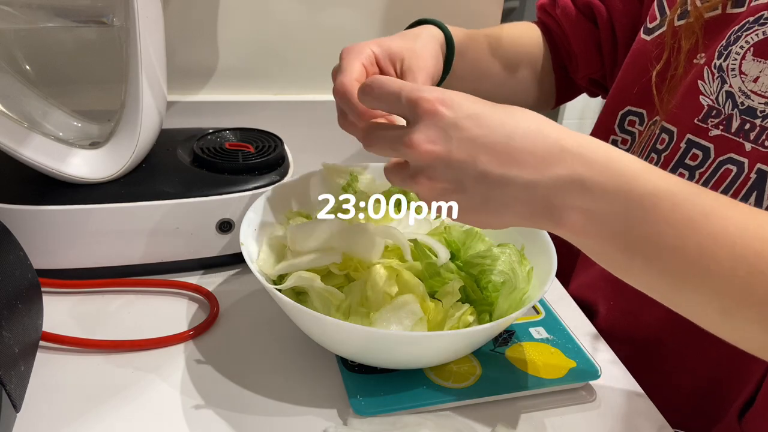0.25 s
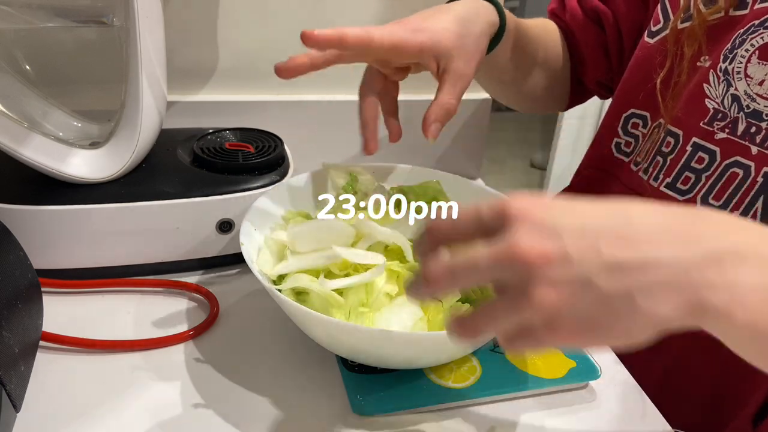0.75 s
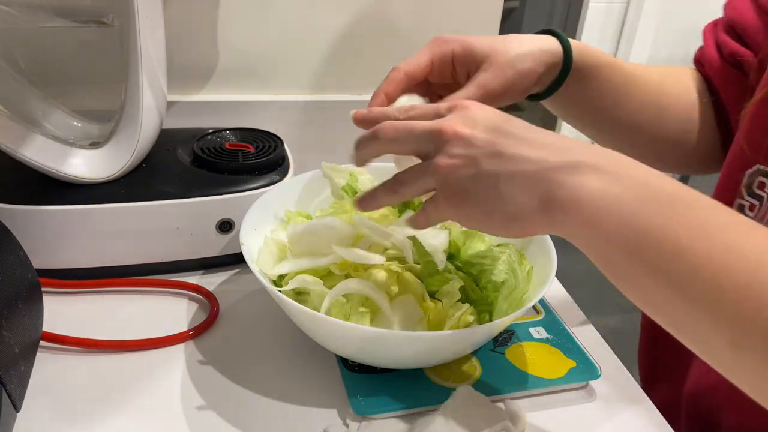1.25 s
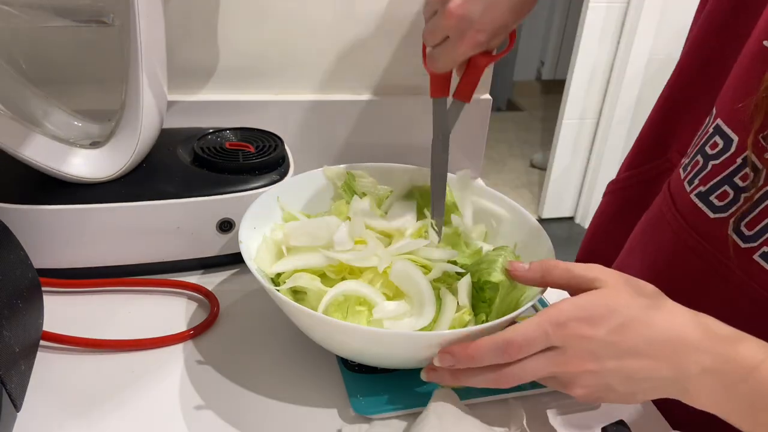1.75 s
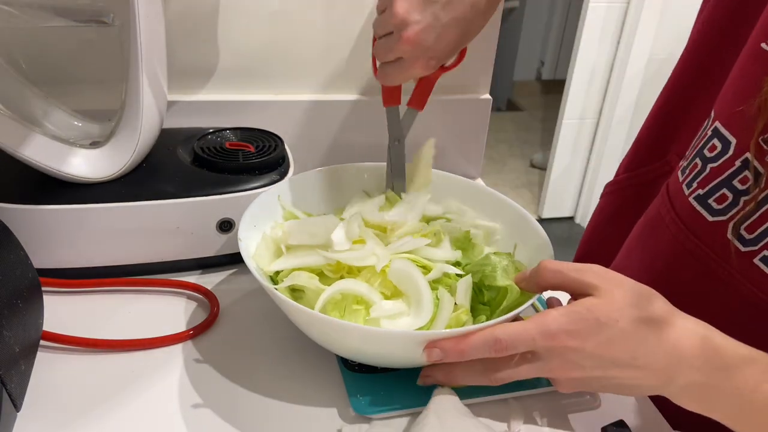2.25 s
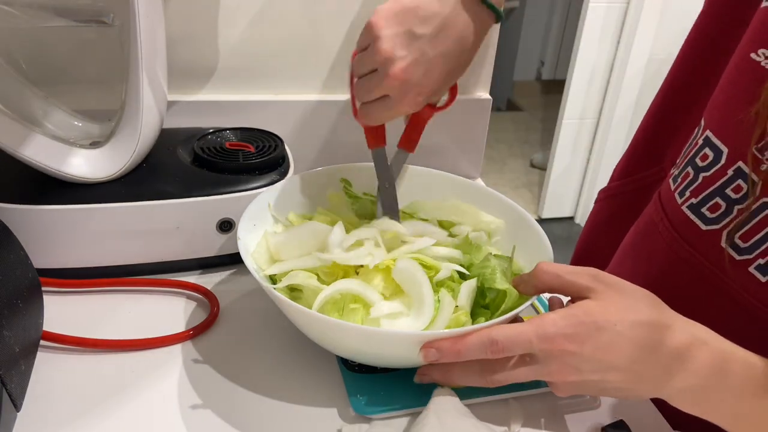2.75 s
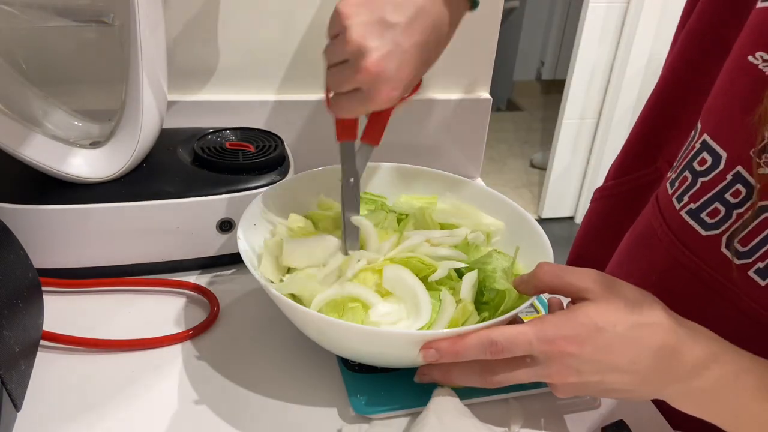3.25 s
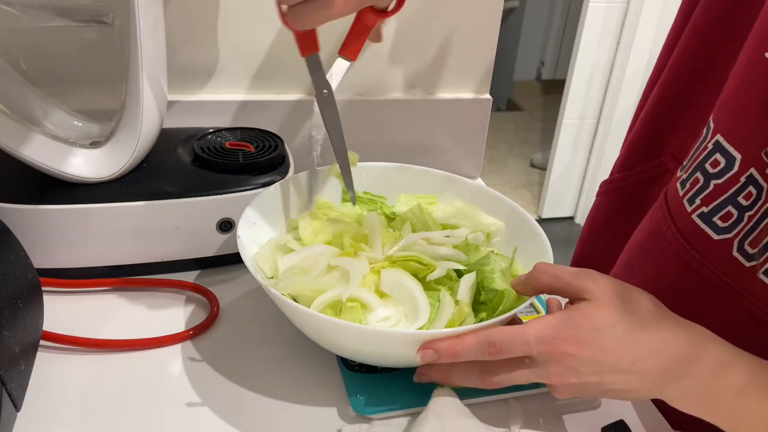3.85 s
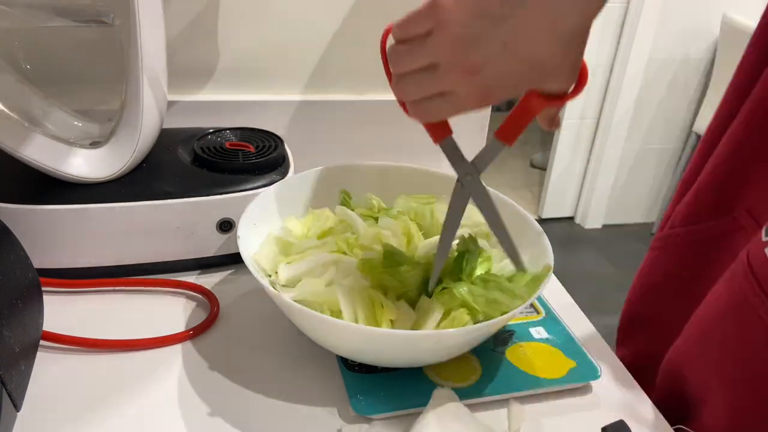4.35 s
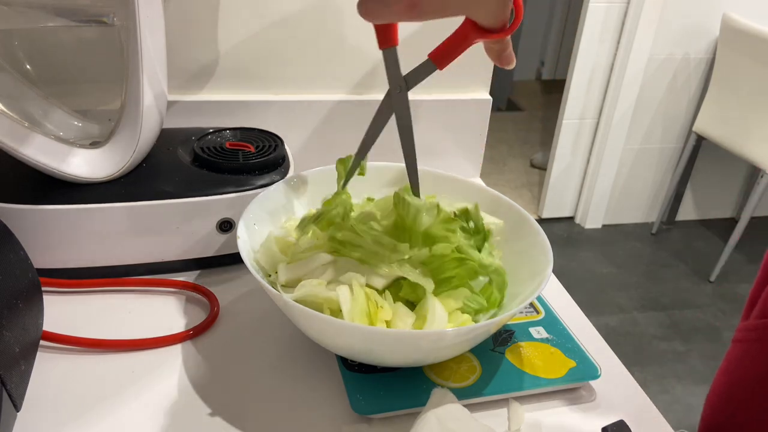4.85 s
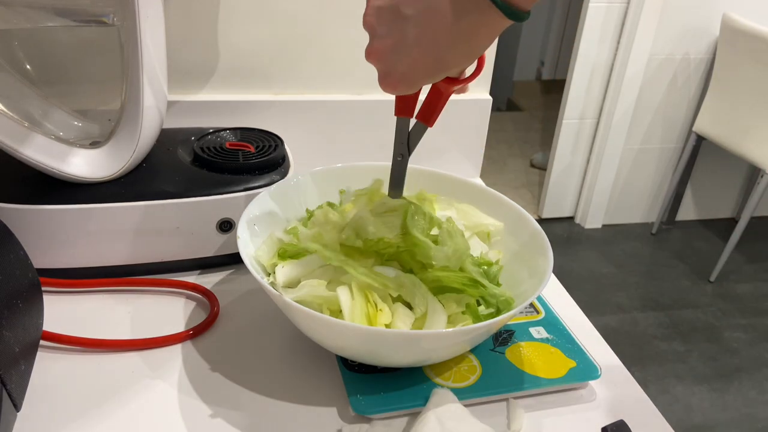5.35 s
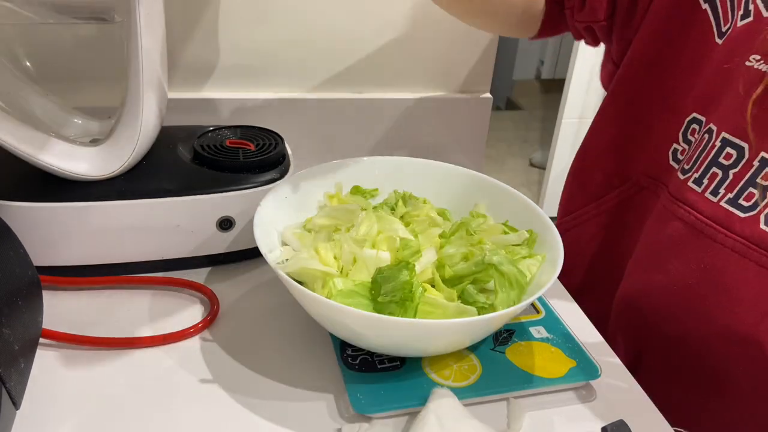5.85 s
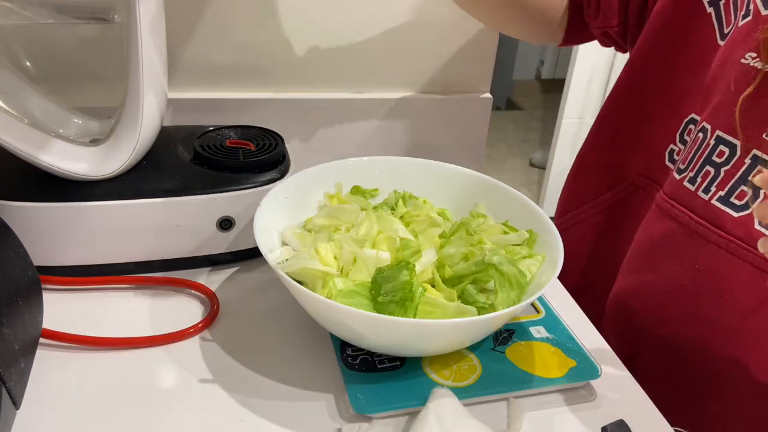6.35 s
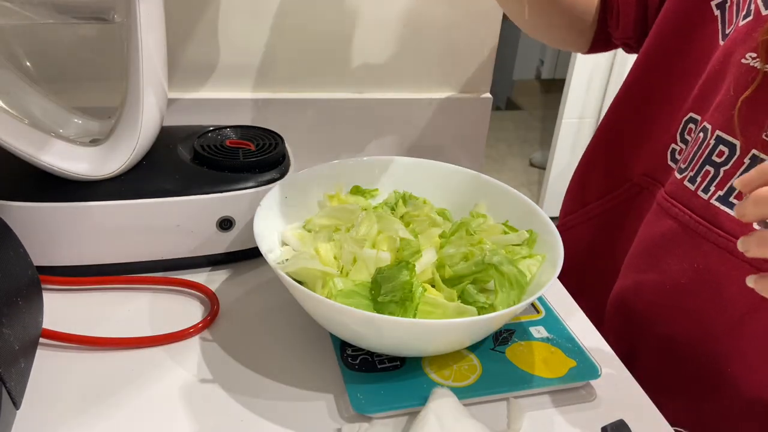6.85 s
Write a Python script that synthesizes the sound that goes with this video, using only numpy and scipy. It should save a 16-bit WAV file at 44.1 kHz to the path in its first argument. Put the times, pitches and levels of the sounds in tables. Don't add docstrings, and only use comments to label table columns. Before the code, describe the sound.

A steady low fan drone fills a small hard-walled kitchen, heard in close stereo beside a salad bowl. From 0 to 1.7 seconds leaves are pulled apart quietly: fine crackles, dull rustles and tiny rib snaps, with a brief dip to silence at 0.86 and the sharpest tear around 1.1. After another cut at 1.68, a soft, distant blade closing, then scissors crunch wetly through leaves from 2.0. Loud cracks with short metal rings fall near 2.3, 2.8, 3.3, 3.7 and 4.1, with low bowl thumps between. A tiny gap at 4.35 precedes a blade jab at 4.4 and a last snip at 4.6; coarse crunches cluster around 5.0 to 5.3. After a cut at 5.62, salt hisses back and forth in a glass shaker, with bright ticks and stronger knocks near 6.4, 6.65 and 6.9, fading into the hum.

```python
import sys
import numpy as np
from scipy import signal
from scipy.fft import rfft, irfft, next_fast_len
from scipy.io import wavfile
from scipy.ndimage import uniform_filter1d

SR = 44100
rng = np.random.default_rng(int(sys.argv[2]) if len(sys.argv) > 2 else 0)


def decibels_to_gain(level_db):
    exponent = np.asarray(level_db, float) / 20
    return 10 ** exponent


def store_wav(level_fs):
    pcm = np.round(np.clip(np.atleast_2d(level_fs), -1, 1) * 32767)
    wavfile.write(sys.argv[1], SR, pcm.T.astype(np.int16))


N = 313110
TIME = np.arange(N) / SR
SIZE = next_fast_len(N + SR)
HZ = np.arange(SIZE // 2 + 1) * SR / SIZE + 0.0008


def shape(x, gain):
    return irfft(rfft(x, SIZE) * gain, SIZE)[..., :N]


def along(table):
    hz, value = np.transpose(table)
    return np.interp(np.log(HZ), np.log(hz), value)


def bumps(table):
    return decibels_to_gain(sum(db * np.exp(-.5 * ((HZ - hz) / (width / 2)) ** 2) for hz, width, db in table))


def band(x, lo_hz, hi_hz):
    sos = signal.butter(3, [lo_hz, min(hi_hz, .45 * SR)], "bandpass", fs=SR, output="sos")
    return signal.sosfilt(sos, x)


def level(x, db=0):
    return x * decibels_to_gain(db) / np.sqrt(np.mean(x ** 2))


def add(out, x, s):
    i = int(s * SR)
    out[..., i:i + x.shape[-1]] += x[..., :N - i]


def gains(pushes, layers, stops=()):
    out = np.zeros((len(layers), N))
    for start_s, full_s, go_s, db, bright_db in pushes:
        end_s = min([s for s in stops if s > start_s] + [go_s + .3])
        t = TIME[int(start_s * SR):int(end_s * SR)]
        short = np.clip((full_s - t) / max(full_s - start_s, .002), 0, 1)
        late = np.maximum(t - go_s, 0)
        curves = [db + offset + weight * bright_db - attack * short - release * late
                  for offset, weight, attack, release in layers]
        add(out, decibels_to_gain(np.array(curves)), start_s)
    return out


def grains(rate, scatter_db):
    spread = np.minimum(rng.exponential(size=N), 5)
    size = decibels_to_gain(scatter_db * spread) * rng.standard_normal(N)
    return size * (rng.random(N) < rate / SR)


def ring(modes, length=.4):
    t = np.arange(int(length * SR)) / SR
    return sum(decibels_to_gain(db - 60 * t / t60) * np.sin(2 * np.pi * hz * t) for hz, db, t60 in modes)


def burst(db, top_db, rise, t60, lo_hz, air_db):
    t = np.arange(2048) / SR
    envelope = np.minimum(t / rise, 1) * decibels_to_gain(-60 * np.maximum(t - rise, 0) / t60)
    noise = rng.standard_normal(2048) * envelope
    top = band(noise, 9000, 12900) + decibels_to_gain(air_db) * band(noise, 12900, 16500)
    return decibels_to_gain(db) * (band(noise, lo_hz, 9000) + decibels_to_gain(top_db) * top)


# pitch_hz, density_db (per Hz)
FAN_MID = [(21, -69), (35, -21.5), (65, -25), (129, -8), (185, -12), (233, -2), (342, -7.5), (410, -24),
           (490, -17), (572, -23.5), (1110, -29), (1270, -29.5), (6360, -55), (8430, -73), (16000, -57)]
# pitch_hz, width_hz, boost_db
DUCT = [(62, 14, 2), (112, 34, 0.5), (143, 15, -2), (165.5, 14.2, -14), (231.4, 25, 5), (320.3, 29, 3.5),
        (489, 40, 6), (662, 27, 5.5), (858, 49, 6.5), (1129, 37, 7)]
# pitch_hz, likeness_0_to_1, right_phase_rad, left_minus_right_db
FAN_PORTS = [(30, .95, 3, 8), (61, 0.9, 1.5, -0.5), (95, 1, -1.4, 1), (152, 0.97, 0.6, 4.5), (216, 1, 1, 0),
             (262, 0.94, 0.7, 0), (311, 0.66, 0.5, 8.5), (430, 0.43, -1.5, -0.5), (760, 0.02, -2.5, -3),
             (1620, 0.61, -3, 0), (3250, 0.22, -0.5, -0.5), (6260, 0, -15.5, 3), (10540, .6, 0.5, -3),
             (15000, 0.1, -11, -2)]


def fan():
    hz, *columns = np.transpose(FAN_PORTS)
    like, phase, pan_db = (along(np.transpose([hz, c])) for c in columns)
    like = np.clip(like, 0, 1)
    shared, left, right = rfft(rng.standard_normal((3, SIZE)))
    common = np.sqrt(like) * shared
    own = np.sqrt(1 - like)
    pair = np.array([common + own * left, common * np.exp(1j * phase) + own * right])
    colour = decibels_to_gain(along(FAN_MID) + np.array([pan_db, -pan_db]) / 2) * bumps(DUCT)
    return level(irfft(pair * colour, SIZE)[:, :N], -35)


# peak_s, level_db
THUMPS = [
    (1.8, -60),
    (2.1, -47.5),
    (2.862, -50),
    (3.28, -53),
    (3.68, -48),
    (4.03, -56),
    (4.23, -48),
    (4.5, -43),
    (4.84, -62),
    (5.21, -47),
]


def rocking():
    rise_db_s, fall_db_s = 109, 56
    gain = sum(decibels_to_gain(db - np.maximum(rise_db_s * (s - TIME), fall_db_s * (TIME - s))) for s, db in THUMPS)
    return gain * level(band(rng.standard_normal(N), 46.4, 108))


# start_s, full_s, release_s, level_db, brightness_db
SHAKING = [(5.626, 5.7, 5.738, -52, 1.5), (5.79, 5.83, 5.8, -55.5, -1.5), (5.864, 5.9, 5.97, -51, 1.5),
           (6.045, 6.07, 6.14, -60, 0), (6.105, 6.16, 6.24, -50.5, 0), (6.24, 6.26, 6.42, -59.5, -4),
           (6.345, 6.36, 6.33, -52.5, 3.5), (6.392, 6.406, 6.49, -51.5, 2.5), (6.49, 6.52, 6.58, -60, -5),
           (6.585, 6.6, 6.6, -56, 4.5), (6.645, 6.66, 6.722, -52, 2), (6.78, 6.82, 7.1, -58.5, -5.5),
           (6.856, 6.91, 6.97, -50, 1), (7.05, 7.08, 7.54, -58, -3.5)]
# offset_db, brightness_weight, attack_depth_db, release_db_per_s
SALT_LAYERS = [(-1, 0, 9, 450), (0, 1, 3, 600), (-3, 1, -3, 450)]
# start_s, peak_db, top_db
KNOCKS = [(5.6308, -42, 2), (5.653, -46, -6), (5.718, -37, 1), (5.868, -53, -9), (5.8867, -49, -2),
          (6.112, -44, 4), (6.1672, -37.5, 6.5), (6.3515, -47, -4.5), (6.393, -43, -12), (6.411, -26.5, -7),
          (6.591, -40, 4), (6.6545, -32, -11), (6.693, -45, -15), (6.861, -40, -4), (6.889, -43, -13),
          (6.926, -29.5, -15)]
# pitch_hz, width_hz, level_db
SHAKER = [(4620, 90, -16), (5010, 110, -11), (7190, 150, 1), (10900, 250, -13), (11500, 350, -8)]


def shaker():
    salt = level(grains(4000, 2.2))
    body, top, air = gains(SHAKING, SALT_LAYERS)
    hits = top * level(grains(900, 2.9))
    out = decibels_to_gain(0.5) * band(body * salt, 2600, 11800)
    out = out + top * level(band(salt, 10450, 13140))
    out = out + air * level(band(salt, 13500, 16500))
    for s, db, top_db in KNOCKS:
        add(out, burst(db - 8, top_db + 12, .0005, .012, 4000, -2), s)
        add(hits, decibels_to_gain(db - 10.0) * rng.standard_normal(40), s)
        modes = [(hz + 120 * rng.standard_normal(), -4, .045) for hz in (4700, 5150)]
        add(out, decibels_to_gain(db - 9) * ring(modes, .05), s)
    glass = sum(decibels_to_gain(db) * signal.lfilter(*signal.iirpeak(hz, hz / width, SR), hits)
                for hz, width, db in SHAKER)
    return out + decibels_to_gain(16) * glass


# start_s, full_s, release_s, level_db, brightness_db
TEARING = [
    (0.0, .035, 0.054, -68.5, 4),
    (.1, .107, 0.15, -75, 10),
    (.185, .245, 0.25, -62.5, 5),
    (.36, .48, 0.48, -68, -14),
    (.63, .64, 0.72, -87, -17),
    (.87, .95, 1.07, -79, -2),
    (1.085, 1.097, 1.057, -58, -1),
    (1.125, 1.132, 1.154, -61.5, 8.5),
    (1.3, 1.305, 1.38, -74, -5),
    (1.36, 1.4, 1.58, -78.5, -8),
]
# offset_db, brightness_weight, attack_depth_db, release_db_per_s
TEAR_LAYERS = [(1.5, 0.094, 21, 320), (2, 1.3, 25, 331)]
# start_s, full_s, release_s, level_db, brightness_db
CUTTING = [(2.025, 2.125, 2.205, -35.5, -3.5), (2.26, 2.284, 2.33, -35, 2), (2.576, 2.59, 2.67, -55.5, 1),
           (2.65, 2.726, 2.79, -38, -0.5), (3.13, 3.148, 3.14, -51, 1.5), (3.14, 3.215, 3.245, -41, 4),
           (3.54, 3.61, 3.62, -37.5, 2.5), (3.67, 3.695, 3.7, -40, 5), (3.95, 3.958, 3.9, -60.5, 3),
           (3.96, 4.012, 4.06, -39, -0.5), (4.35, 4.358, 4.35, -44, -1.5), (4.414, 4.425, 4.44, -37, -3),
           (4.47, 4.52, 4.56, -44.5, 4.5), (4.72, 4.76, 4.81, -63.5, 8), (4.975, 4.995, 5.02, -49.5, -2.5),
           (5.016, 5.026, 5.1, -42.5, -13), (5.068, 5.079, 5.08, -35.5, -3),
           (5.125, 5.143, 5.142, -32.5, -3.5), (5.17, 5.2, 5.29, -52.5, -0.5),
           (5.298, 5.322, 5.323, -38.5, 0.5), (5.45, 5.54, 5.57, -60, 6)]
CUT_LAYERS = [(0, 0, 34, 330), (-1, 1, 25, 270), (-5, 1.1, 23, 280)]
# start_s, peak_db, top_db
SNAPS = [(0.1066, -62.5, 19), (0.1944, -67, 12), (0.2296, -59, -2), (0.468, -53, -20), (0.504, -50, -4),
         (0.6384, -58, -39), (0.697, -50, -29), (1.099, -41.5, -0.5), (1.1323, -39, -2), (1.3063, -51, 4),
         (1.5373, -49, -24), (2.0518, -39.5, 0), (2.1326, -24.5, -32), (2.176, -25.5, -17),
         (2.59, -42, -11), (3.1413, -44, -5), (3.1733, -31.5, 0), (3.5783, -30, -17), (3.9567, -41, 2),
         (4.0534, -22, -0.5), (4.5136, -28, -1), (4.534, -24, -26), (5.0237, -29, -26),
         (5.0777, -36.5, -16), (5.1014, -32, -20), (5.14, -22, -28), (5.3034, -32, -10), (5.3206, -27, -12)]


def leaves():
    own_cells = np.array([grains(6000, 2.8), grains(5000, 2.8)])
    cells = grains(4500, 3.9) + 0.97 * own_cells
    low, mid, top = gains(CUTTING, CUT_LAYERS, np.transpose(SNIPS)[0])
    out = low * level(band(cells, 1000, 3500))
    out = out + mid * level(band(cells, 3500, 9000))
    out = out + top * level(band(cells, 9000, 16000))
    fine = grains(5500, 5.3)
    mid, top = gains(TEARING, TEAR_LAYERS)
    out = out + mid * level(band(fine, 2300, 13600)) + top * level(band(fine, 11200, 15000))
    for s, db, top_db in SNAPS:
        add(out, burst(db - 2, top_db + 4.0, 0.0008, 0.035, 1200, -9), s)
    return out


# start_s, peak_db, top_db, ring_db, room_db
SNIPS = [
    (1.6839, -30.5, -11, -13.5, 11),
    (2.2885, -16, -6, -9.5, -4.5),
    (2.795, -11.5, -7.5, -10, -9),
    (3.266, -11.5, -5.5, -16, -6),
    (3.7, -11, -6.5, -16, -7.5),
    (4.084, -13, -8, -13.5, -5.5),
    (4.5784, -14, -9.5, -16.5, -8),
]
# pitch_hz, level_db, t60_s
BLADES = [(2534, -5, 0.085), (2640, -4, 0.083), (2704, -7.5, 0.069)]
# start_s, level_db, low_hz, high_hz
JAB = (4.4185, -21, 2000, 4400)
# start_s, level_db
TOUCHES = [
    (3.957, -53),
    (4.355, -41),
]
# pitch_hz, level_db, t60_s
BOWL = [(2730, -3, 0.19), (3600, -10.5, 0.19), (7400, -1, 0.11)]


def scissors():
    near, far = np.zeros((2, N)), np.zeros(N)
    pan_db = 0.3
    pan = decibels_to_gain(np.array([[pan_db], [-pan_db]]) / 2)
    click = band(np.eye(1, 1024)[0], 1600, 12800)
    for s, db, top_db, ring_db, room_db in SNIPS:
        crack = burst(db - 0.5, top_db + 9, 0.002, 0.031, 1180, -20)
        push = rng.standard_normal(130) / 11
        metal = decibels_to_gain(db + ring_db) * np.convolve(ring(BLADES), push)
        add(far, decibels_to_gain(db + room_db + 20.5) * click, s)
        add(far, decibels_to_gain(db + room_db + ring_db + 31) * band(click, 2330, 3080), s)
        add(metal, crack, 0)
        add(metal, decibels_to_gain(db + 14) * click, .0018)
        add(near, metal * pan, s)
    s, db, lo_hz, hi_hz = JAB
    jab = sum(band(burst(db + 11, -30, rise, .014, 1200, 0), lo_hz, hi_hz)
              for rise in (.0004, .0015, .0035))
    add(near, jab, s)
    add(far, decibels_to_gain(db + 19) * band(click, lo_hz, hi_hz), s)
    for s, db in TOUCHES:
        add(near, decibels_to_gain(db) * ring(BOWL), s)
    return near, far


# pitch_hz, width_hz, boost_db
TONE_SHAPING = [(1250, 210, 3), (2375, 860, 3.5), (3160, 700, -1), (5700, 2400, 1.5)]


def tone_shaped(x):
    return shape(x, bumps(TONE_SHAPING))


# pitch_hz, t60_s, level_db
ROOM = [(654, 0.34, 3), (1430, 0.45, -8), (2490, 0.56, -1.5), (3700, 0.44, -2.5), (5590, 0.45, 8),
        (7000, 0.49, -2), (13000, 0.35, -5), (15000, 0.13, -19)]


def room(x, wet_db):
    t = np.arange(SR // 2) / SR
    hz, t60, db = np.transpose(ROOM)
    tail = 0
    for centre_hz in 600 * 2 ** np.arange(0, 4.8, 1 / 3):
        fall_db = np.interp(centre_hz, hz, db) - 60 * t / np.interp(centre_hz, hz, t60)
        noise = rng.standard_normal((2, len(t)))
        tail = tail + decibels_to_gain(fall_db) * band(noise, centre_hz / 1.125, centre_hz * 1.125)
    tail = tail * np.minimum(t / 0.0008, 1)
    return decibels_to_gain(wet_db) * np.array([signal.fftconvolve(x, side)[:N] for side in tail])


def ports(x, bowl_db, pan_db):
    lag_s = 12 / SR
    t = np.arange(256) / SR
    scatter = band(rng.standard_normal((2, 256)), 2000, 8000) * decibels_to_gain(bowl_db - 60 * t / .012)
    scatter[:, 0] = 1
    gain = rfft(scatter, SIZE)
    gain = gain / np.abs(gain) ** .8
    gain = gain * decibels_to_gain(np.array([[pan_db], [-pan_db]]) / 2)
    return shape(x, gain * np.exp(-2j * np.pi * HZ * lag_s * np.array([[1], [0]])))


def scene():
    crunch, salt = leaves(), shaker()
    snip, snip_far = scissors()
    snip, crunch = tone_shaped(snip), tone_shaped(crunch)
    walls = room(snip_far + decibels_to_gain(-9.5) * crunch[0] + decibels_to_gain(-9.5) * salt, -29)
    near = ports(snip, -5, 0.44) + ports(crunch, -5, 0.34) + ports(salt, -8.5, 0.96)
    return fan() + rocking() + near + walls


# pitch_hz, width_hz, boost_db
TREBLE_DIPS = [(9280, 240, -22), (11300, 2600, 3), (13250, 450, -24)]


def treble_colour(x):
    return shape(x, bumps(TREBLE_DIPS))


# low_hz, high_hz, floor_db, under_middle_db
DROPPED = [(8500, 9500, -107, -9), (12800, 13700, -104, -7), (13700, 14800, -97, -18),
           (14800, 16500, -98, -19)]


def gated(x):
    masked_db = -12.5
    hz, _, z = signal.stft(x, SR, nperseg=1024)
    power = np.mean(np.abs(z) ** 2, axis=0)
    rest = power[(hz > 3000) & (hz < 8000)].mean(axis=0)
    whim = rng.standard_normal((len(DROPPED), len(rest)))
    whim = decibels_to_gain(3 * np.repeat(whim, 3, axis=1)[:, :len(rest)])
    for (lo_hz, hi_hz, floor_db, under_db), luck in zip(DROPPED, whim):
        part = (hz > lo_hz) & (hz < hi_hz)
        threshold = np.maximum(decibels_to_gain(2 * floor_db), rest * decibels_to_gain(2 * under_db))
        z[:, part] *= luck * power[part].mean(axis=0) > threshold
    patch = uniform_filter1d(uniform_filter1d(power, size=5, axis=0), size=3, axis=1)
    crisp = patch[(hz > 10000) & (hz < 12500)].mean(axis=0)
    z *= (patch > crisp * decibels_to_gain(2 * masked_db)) | (hz[:, None] > 8500)
    z[:, hz > 15950] *= decibels_to_gain(-30)
    return signal.istft(z, SR, nperseg=1024)[1][:, :N]


# out_s, in_s, fade_in_s
CUTS = [
    (0.855, .861, 0.01),
    (1.675, 1.682, 0.0028),
    (4.345, 4.354, 0.0019),
    (5.616, 5.622, 0.011),
]


def joins():
    fade = np.ones(N)
    for out_s, in_s, rise in CUTS:
        fade *= np.clip(np.maximum((out_s - TIME) / 0.0027, (TIME - in_s) / rise), 0, 1)
    return fade


def band_limit(x):
    return signal.sosfilt(signal.butter(12, 16830, fs=SR, output="sos"), x)


def record(dry):
    mix = gated(treble_colour(dry)) * joins()
    return band_limit(mix)


dry = scene()
out = record(dry)
store_wav(out)
```